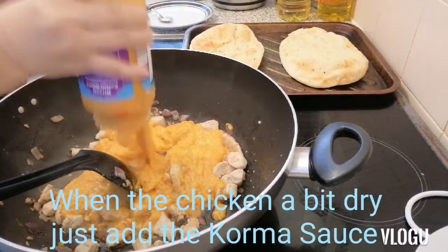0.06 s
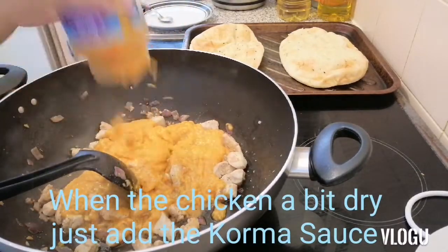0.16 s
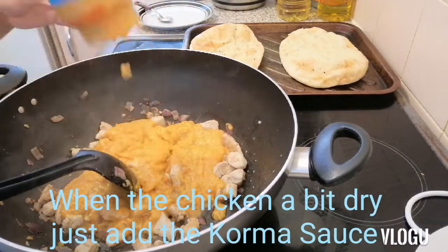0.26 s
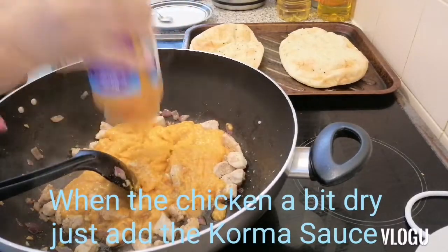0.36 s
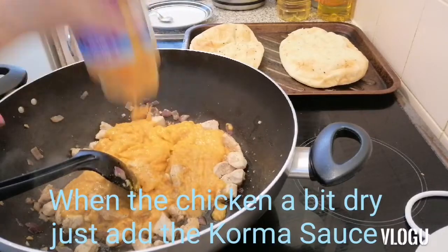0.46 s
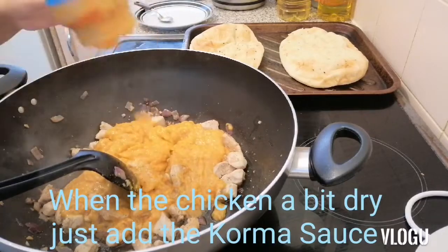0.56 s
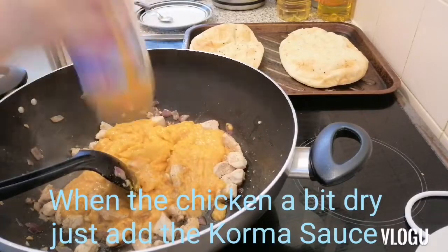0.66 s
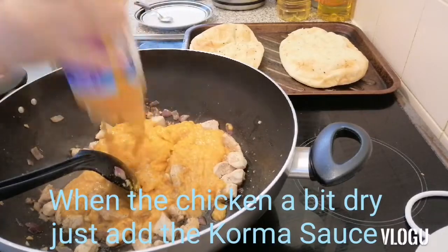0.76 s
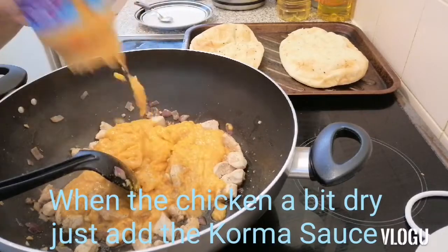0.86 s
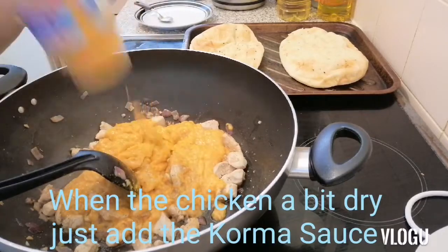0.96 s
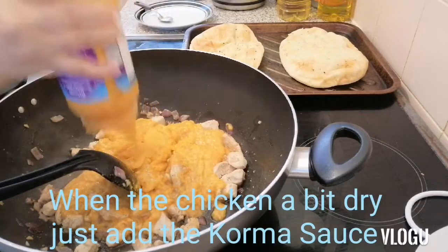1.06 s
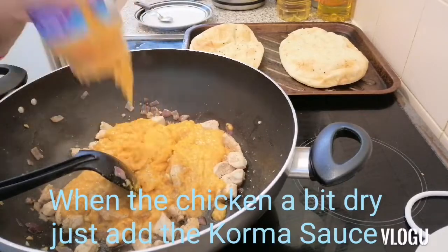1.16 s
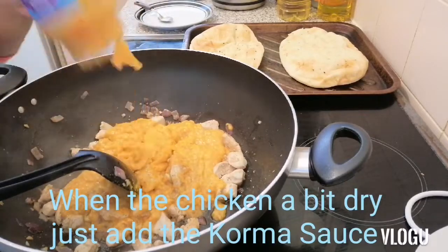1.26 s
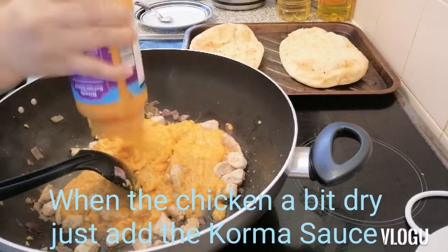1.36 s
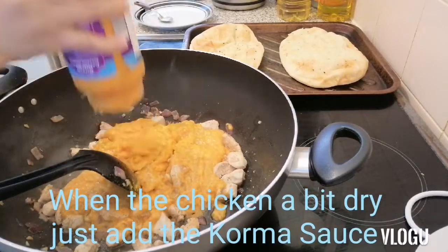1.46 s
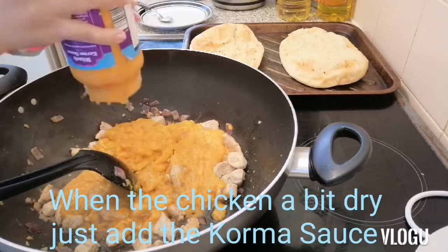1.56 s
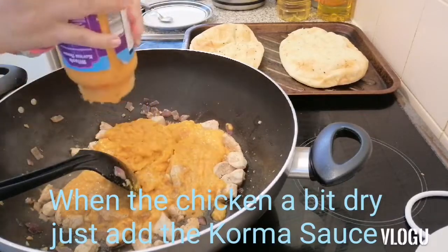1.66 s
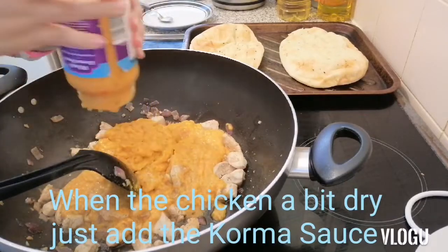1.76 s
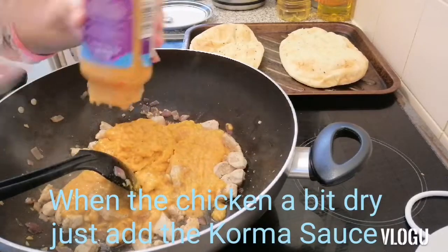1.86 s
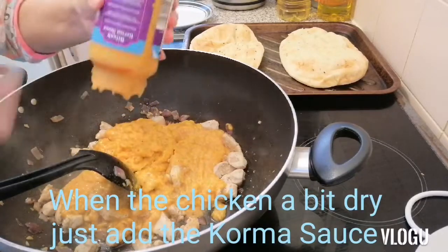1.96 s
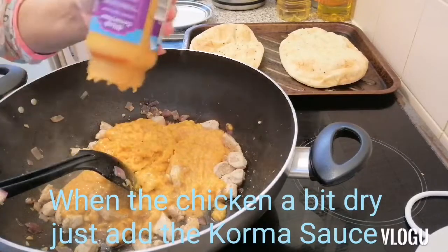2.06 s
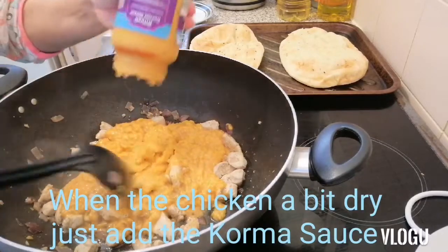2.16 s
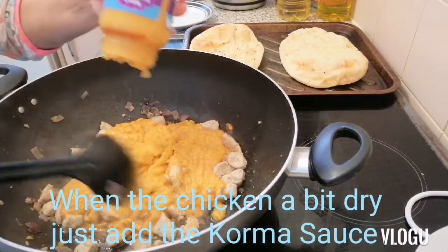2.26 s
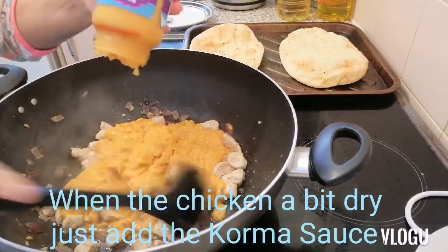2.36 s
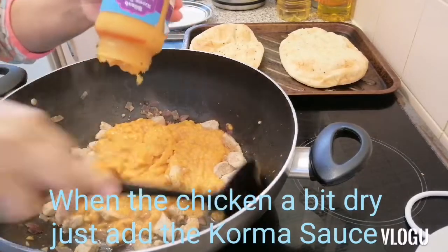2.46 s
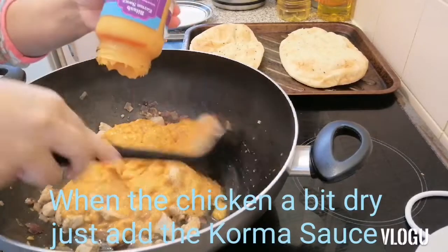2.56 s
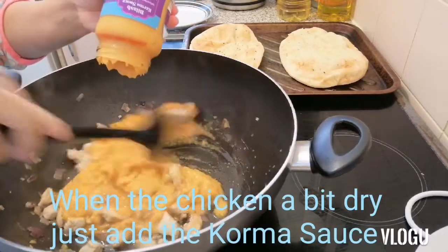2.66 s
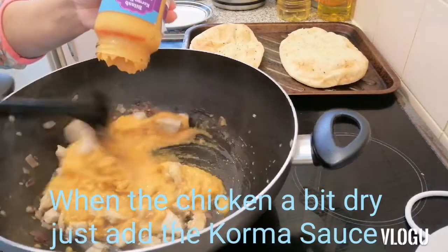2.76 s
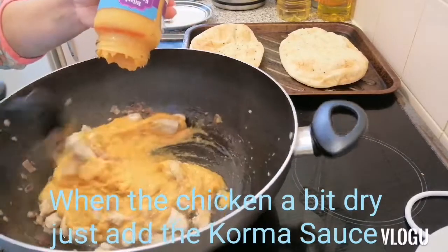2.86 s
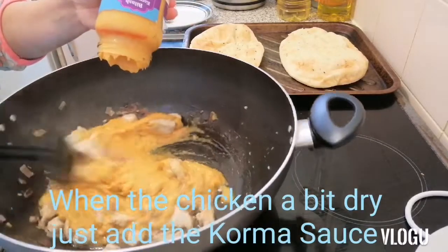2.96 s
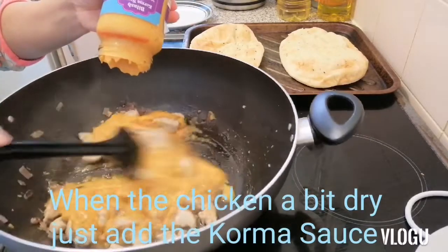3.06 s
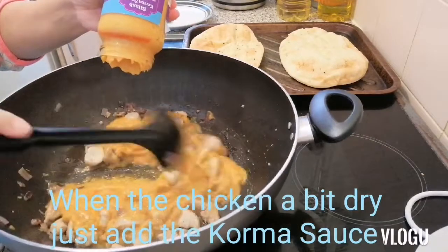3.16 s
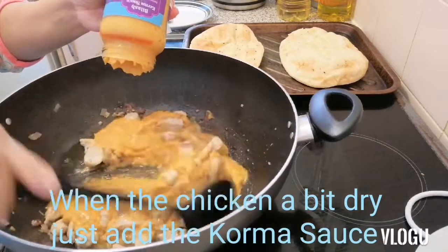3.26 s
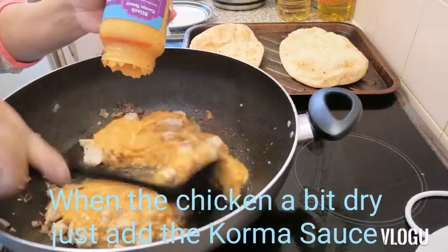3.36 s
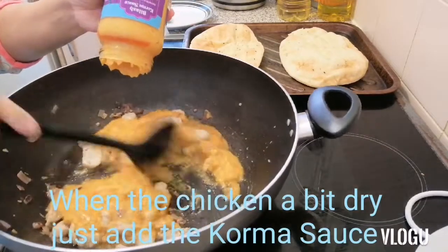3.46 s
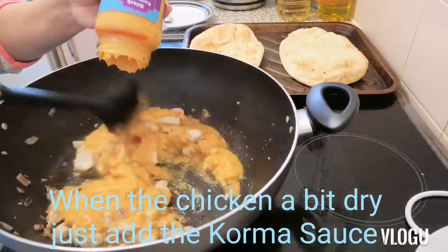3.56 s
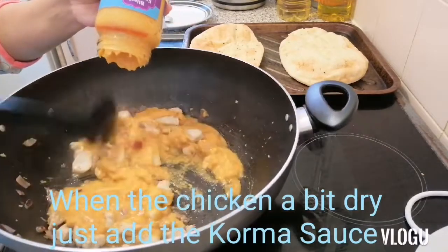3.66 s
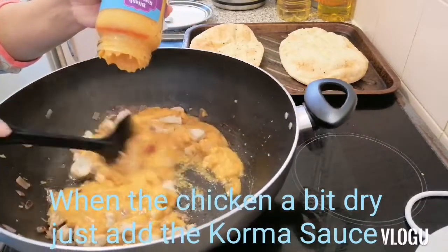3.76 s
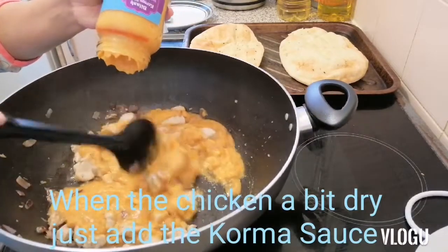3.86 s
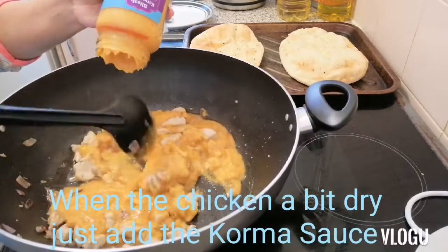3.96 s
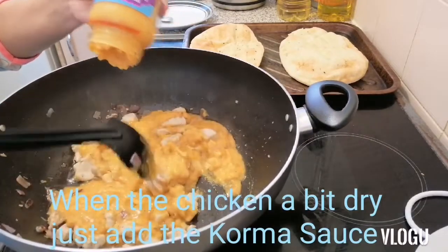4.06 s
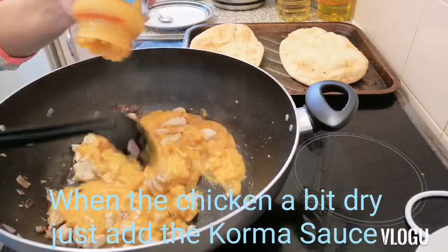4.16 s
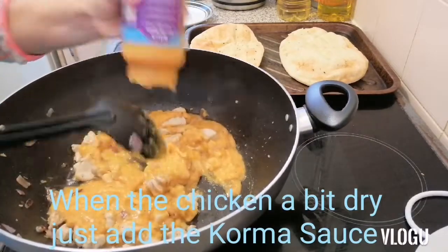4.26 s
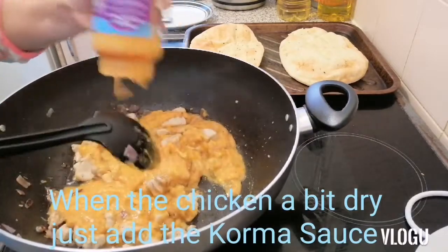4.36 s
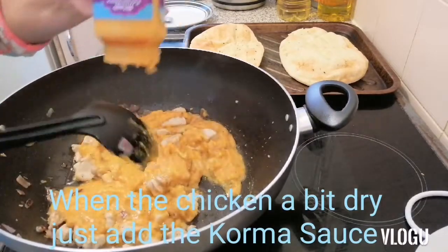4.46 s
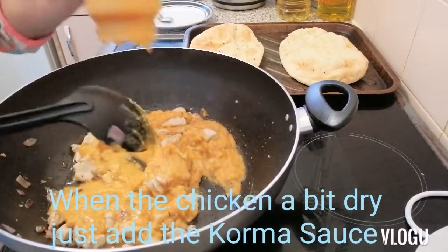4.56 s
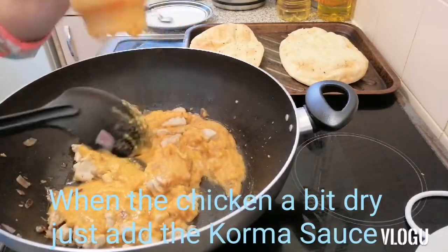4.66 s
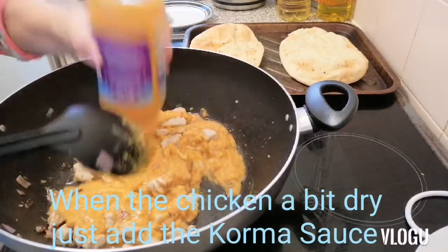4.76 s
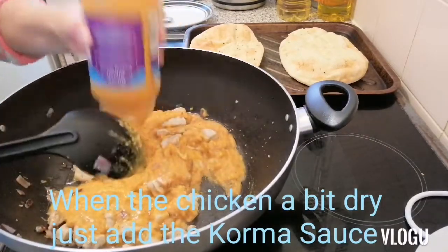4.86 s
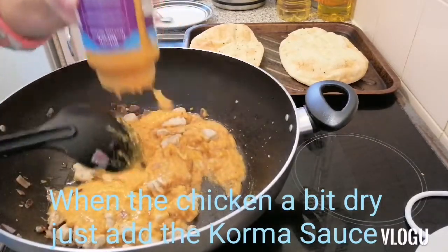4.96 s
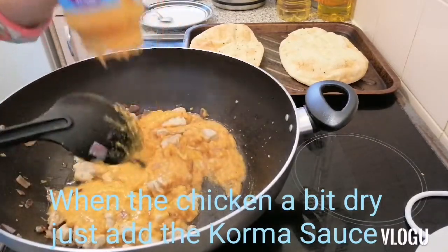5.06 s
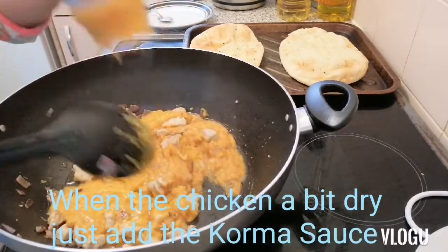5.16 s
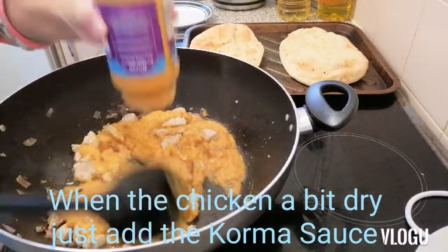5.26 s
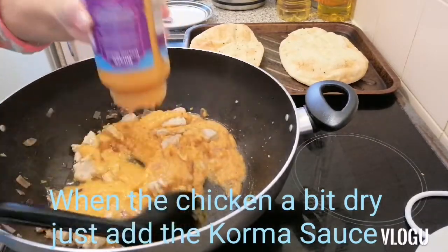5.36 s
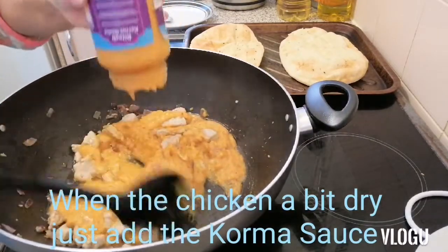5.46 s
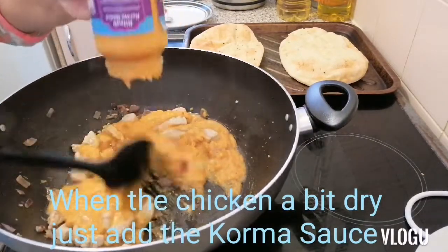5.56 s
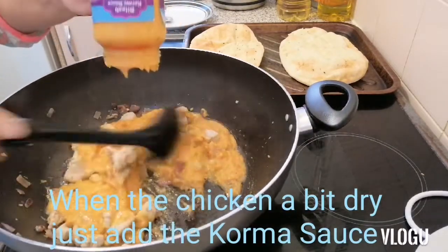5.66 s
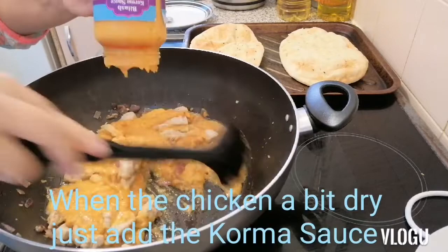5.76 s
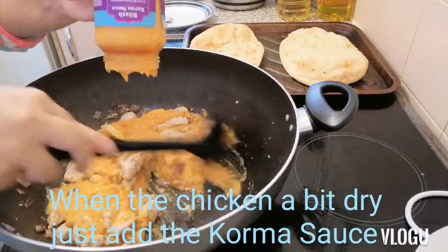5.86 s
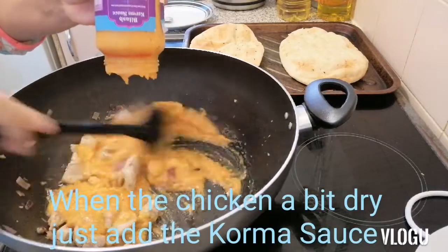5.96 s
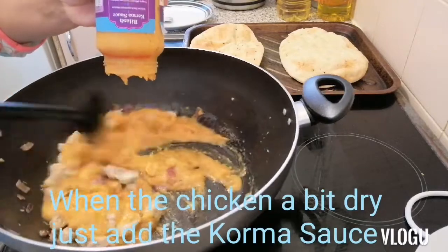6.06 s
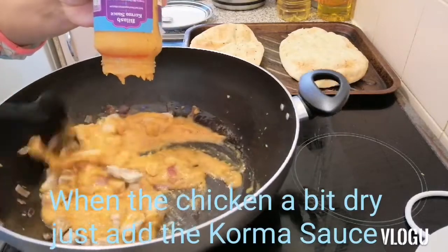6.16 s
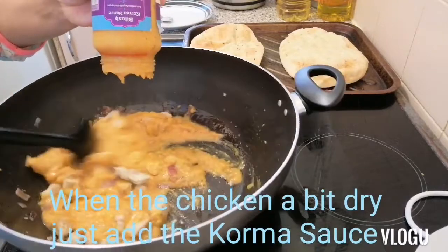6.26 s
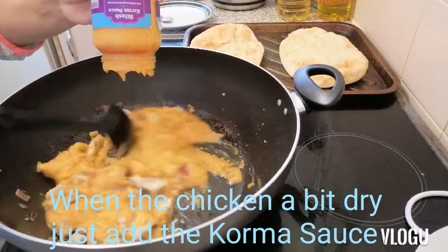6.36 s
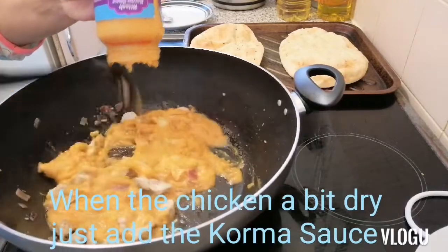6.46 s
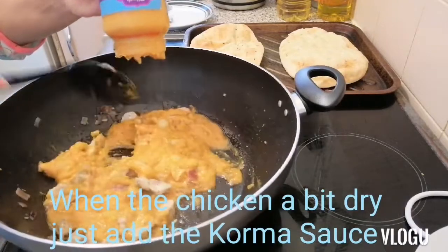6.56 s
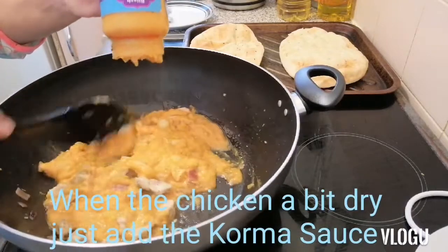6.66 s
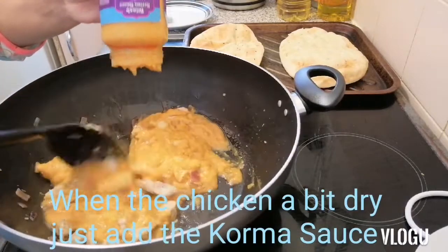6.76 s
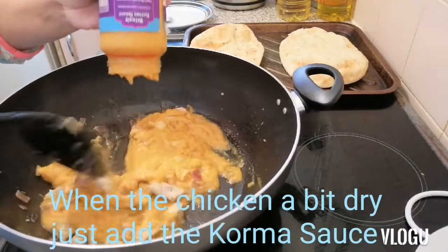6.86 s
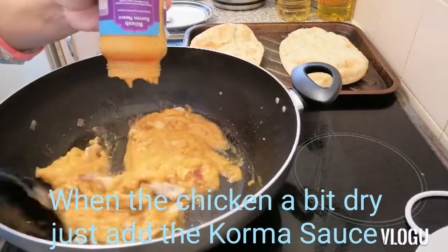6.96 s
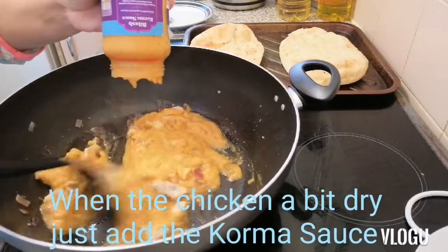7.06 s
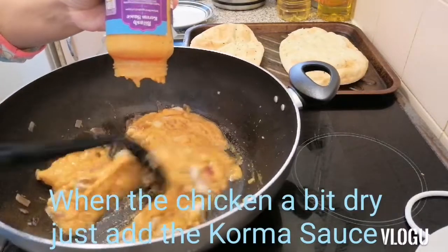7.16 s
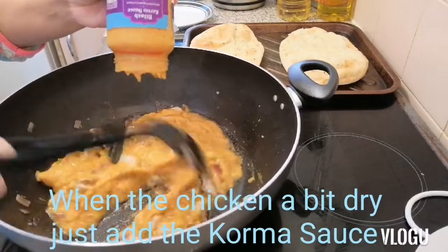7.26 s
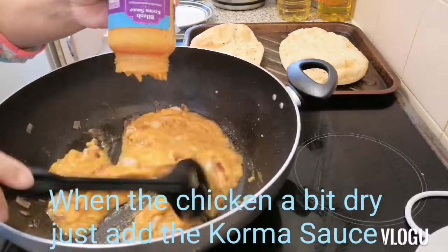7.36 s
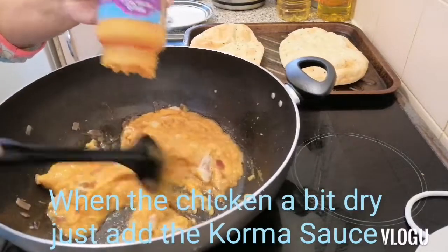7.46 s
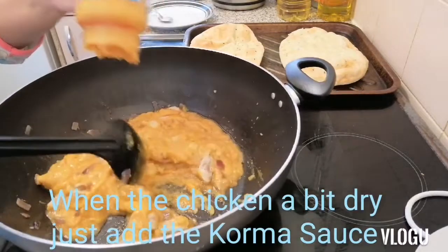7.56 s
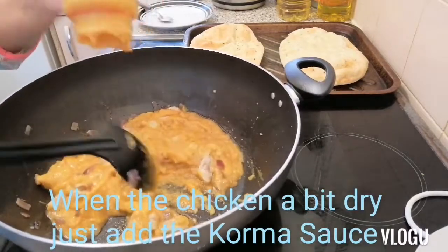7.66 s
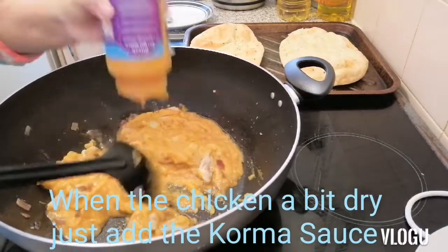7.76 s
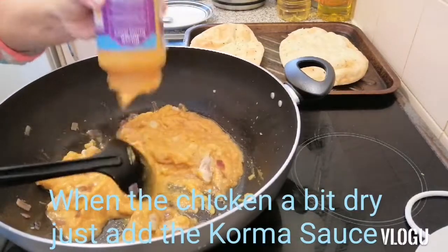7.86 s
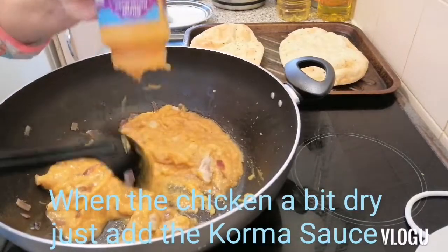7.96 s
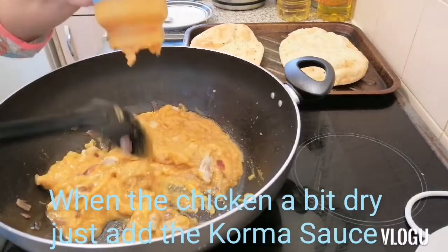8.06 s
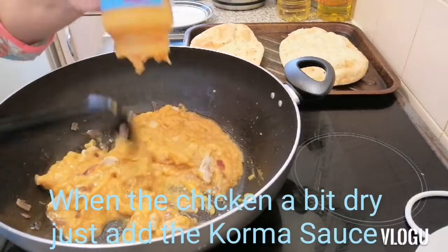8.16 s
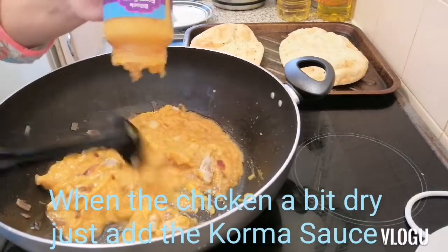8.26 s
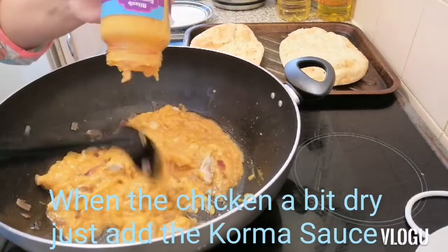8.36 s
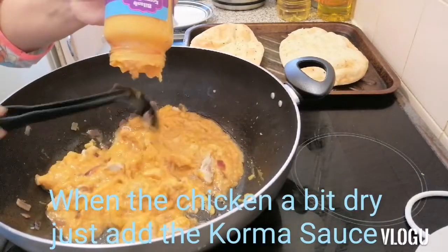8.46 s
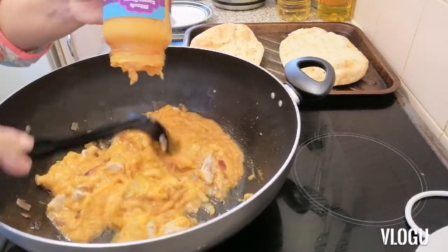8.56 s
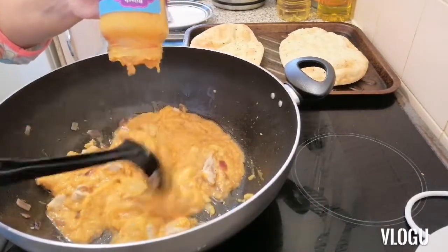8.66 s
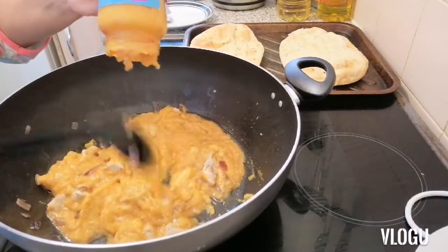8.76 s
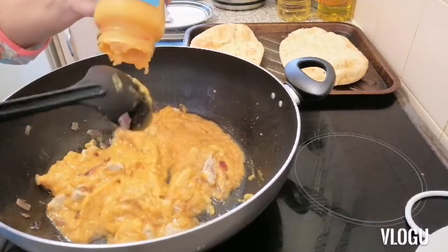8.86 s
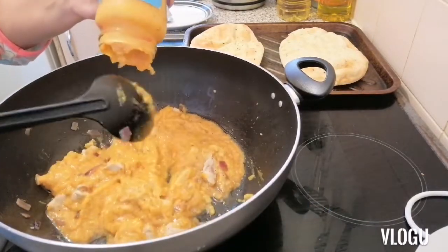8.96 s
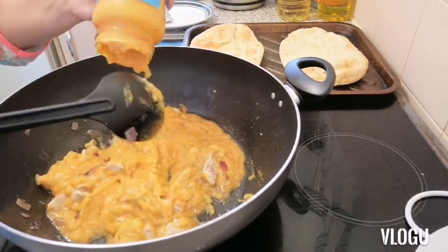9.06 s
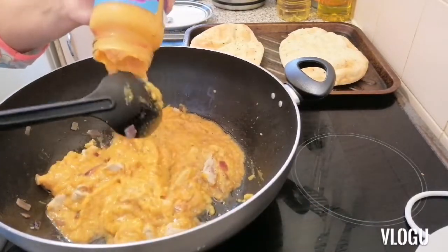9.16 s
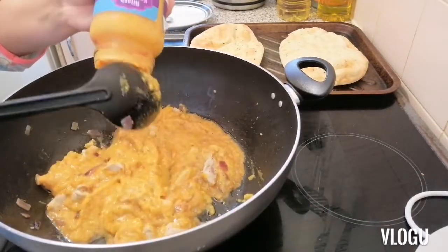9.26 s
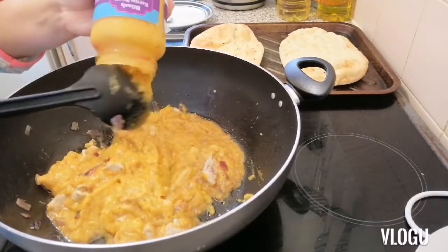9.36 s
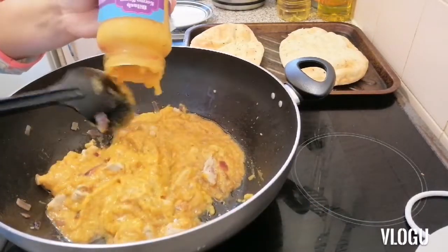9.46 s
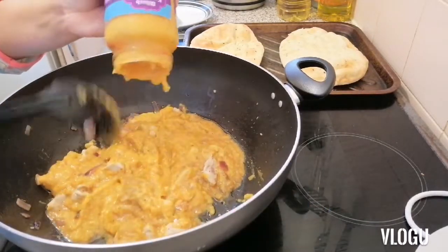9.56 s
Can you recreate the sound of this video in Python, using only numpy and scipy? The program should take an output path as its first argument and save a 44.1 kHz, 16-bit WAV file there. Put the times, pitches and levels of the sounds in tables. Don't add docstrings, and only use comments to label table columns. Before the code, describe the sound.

A pan of frying meat sizzles loudly, then sinks under thick sauce as a plastic spoon scrapes and knocks the metal in a small kitchen.

```python
import sys
import numpy as np
from scipy import signal
from scipy.fft import rfft, irfft, next_fast_len
from scipy.io import wavfile

SR = 44100
rng = np.random.default_rng(int(sys.argv[2]) if len(sys.argv) > 2 else 0)


def decibels_to_gain(level_db):
    exponent = np.asarray(level_db, float) / 20
    return 10 ** exponent


def store_wav(level_fs):
    pcm = np.round(np.clip(np.atleast_2d(level_fs), -1, 1) * 32767)
    wavfile.write(sys.argv[1], SR, pcm.T.astype(np.int16))


N = 423345

# (frequency [Hz], level [dB], t60 [s])
PAN_MODES = [(376, 12, 0.0354), (463, 5, 0.035), (750, 9.5, 0.038), (955, 8.5, 0.056), (1190, -36, 0.0078),
             (1310, 4, 0.018), (1565, 3, 0.011), (1680, 2.5, 0.017), (1920, -31, 0.048), (2150, -5, 0.042),
             (2330, 13, 0.054), (2610, 9, 0.061), (3020, -5.5, 0.0091), (3360, 1, 0.033)]


def sizzle():
    # (time [s], level [dB])
    frying_vigour = [(0.0, -42.5), (2.46, -45.5), (2.57, -45.5), (2.99, -47), (3.07, -51), (3.5, -49.5),
                     (3.87, -51), (4.49, -52.5), (5.37, -52.5), (5.61, -53.5), (6.71, -53), (6.98, -57.5),
                     (7.14, -58), (7.33, -57.5), (7.56, -61), (8.18, -58), (8.85, -64.5), (9.6, -64)]
    # (frequency [Hz], density [dB per Hz])
    bubble_colour = [(310, -19), (520, -28.5), (653, -12.5), (711, -17), (867, -10), (1100, -6), (1430, -6),
                     (2030, -2), (2480, -6), (4080, -11.5), (5570, -11.5), (8420, -16.5), (9560, -13),
                     (15500, -31.5)]
    # (frequency [Hz], t60 [s], level [dB])
    bowl_air = [
        (2020, 0.0045, -4.5),
        (5440, 0.0079, -6),
        (9600, 0.0058, -14),
    ]
    top_follows = 1.365
    patchy_db, shared_db = 1.3, 0.5

    level_db, = in_time(frying_vigour)
    bursts = grains(7000 * decibels_to_gain(2.0 * drift(40)), 3.5)
    bursts = rms_one(bursts + 1.1 * rng.standard_normal(N))
    bursts = bursts + 3.2 * np.diff(grains(60, 1.2), prepend=0)
    bursts = bursts + sum(decibels_to_gain(gain_db) * resonance(bursts, hz, t60) for hz, t60, gain_db in bowl_air)

    together_db = shared_db * drift(12)
    out = 0
    for hz, band in bands(bursts, bubble_colour, 235, count=13):
        share = np.clip(np.log2(hz / 2000) / 2.6, 0, 1.3)
        change_db = (1 + share * (top_follows - 1)) * (level_db - level_db[0])
        out = out + band * decibels_to_gain(change_db + together_db + patchy_db * drift(24.5))
    first_second_rms = np.sqrt(np.mean(out[:SR] ** 2))
    return out * decibels_to_gain(level_db[0] - 0.11) / first_second_rms


def scrapes():
    # (loudest moment [s], length [s], peak level [dB], brightness [dB], centre [Hz])
    strokes = [(2.538, 0.16, -39, -11.5, 1850), (2.695, 0.34, -53.5, -18, 1950),
               (2.996, .1, -36.5, -13, 1720), (3.114, 0.069, -46, -11, 2040),
               (3.352, 0.11, -36.5, -11, 1740), (3.268, 0.021, -45, -18, 1880),
               (3.652, 0.033, -60, 3, 1920), (3.715, 0.11, -46.5, -6, 1800), (3.843, 0.1, -43, -16, 2000),
               (5.152, 0.01, -48, -7, 1960), (5.252, 0.027, -50.5, -16, 2050),
               (5.45, 0.14, -45.5, -3, 1500), (5.8, 0.074, -59, 4.5, 1950), (5.918, 0.13, -52, -5.5, 1660),
               (6.152, 0.035, -50, -8, 1910), (6.332, 0.12, -53, -4.5, 2000), (6.584, .08, -40, -8.5, 1670),
               (6.693, 0.085, -40.5, -20, 1890), (6.79, 0.17, -55.5, -12, 1800),
               (7.055, 0.067, -41, -15, 1890), (7.154, 0.085, -60.5, -6.5, 1500),
               (7.445, 0.22, -58, -3.5, 1690)]
    # (loudest moment [s], length [s], peak level [dB], brightness [dB], centre [Hz])
    wall_slide = (7, 0.09, -34, -24, 1200)
    stroke_climb, slide_climb = 1.4, 9.3
    rise_share, fall_db = 0.52, 18.5
    rasp_lingers = 0.54

    t = np.arange(N) / SR
    level, bright, pitch = np.full(N, 1e-9), np.zeros(N), np.full(N, 1.7e-6)
    moves = [(*row, stroke_climb) for row in strokes] + [(*wall_slide, slide_climb)]
    for s, length_s, peak_db, bright_db, hz, climb in moves:
        late = (t - s) / length_s
        loss_db = fall_db * np.where(late < 0, (late / rise_share) ** 2, late)
        push = decibels_to_gain(peak_db - np.minimum(loss_db, 150))
        level += push
        bright += push * decibels_to_gain(bright_db + rasp_lingers * np.minimum(loss_db, 30))
        pitch += push * hz * 2 ** (climb * np.clip(t - s, -length_s, 2 * length_s))
    centre_hz = pitch / level

    slips = [grains(3000 * decibels_to_gain(3.7 * drift(30)), 2.0) for _ in range(2)]
    body = 0
    for k, (hz, _, t60) in enumerate(PAN_MODES[2:14]):
        answer = rms_one(resonance(slips[k % 2], hz, 0.6 * t60))
        body = body + answer * decibels_to_gain(-24.0 * np.log2(hz / centre_hz) ** 2)
    body = rms_one(band_pass(body, 415.6, 2660))
    rasp = rms_one(band_pass(slips[0], 2760, 6400) + 0.27 * band_pass(slips[1], 4700, 13000))
    return level * body + bright * rasp


def knocks():
    # (time [s], peak level [dB], loudest ring [Hz], low level [dB], rim level [dB])
    bottom_hits = [(2.5366, -31, 1750, -20.5, -15), (2.7917, -38.5, 1910, -1.5, -14),
                   (2.9178, -20.5, 1310, -12.5, -18), (3.6632, -17, 2150, -10, -6),
                   (5.3928, -27, 1580, -12, -27), (5.8679, -30.5, 1080, -6, -10),
                   (6.149, -47.5, 2200, -5, -12), (6.559, -30, 1000, -3.5, -6),
                   (7.028, -28, 1840, -10, -30), (7.097, -31, 960, -2, -23), (7.311, -8, 1600, -23.5, -9.5),
                   (8.5082, -7.5, 1720, -21, -16)]
    # (time [s], peak level [dB], loudest ring [Hz], ring level [dB], rim level [dB])
    rim_hits = [
        (2.8873, -8.5, 1500, 9, -2),
        (5.4453, -41, 2100, 0, 14),
        (6.5215, -18.5, 1780, -3, 9),
        (6.9242, -16.5, 1360, 5, 4.5),
    ]
    top_db, top_per_rim = -11, 0.73
    knock_ring_db, knock_echo_db, clack_echo_db = 0.5, -8, 2
    wall_s, wall_db = 0.0052, -15

    hits = []
    for s, peak_db, ring_hz, low_db, rim_db in bottom_hits:
        high_db = top_db + top_per_rim * rim_db
        colour = [(420, low_db), (780, 0.37 * low_db - 2.5), (1250, -2.5), (2500, -0.3 * low_db - 8.5),
                  (3300, 0.61 * rim_db - 5.5), (5300, rim_db), (10000, high_db), (13000, high_db - 16)]
        hits.append((s, decibels_to_gain(peak_db) * blow(colour, ring_hz, knock_ring_db), knock_echo_db))
    for s, peak_db, ring_hz, ring_db, rim_db in rim_hits:
        high_db = top_db + top_per_rim * rim_db
        colour = [(420, -46), (780, -23), (1150, -3.5), (1750, -2), (2500, -5.5), (3300, -5),
                  (4500, rim_db - 3), (5700, rim_db), (10000, high_db), (13000, high_db - 13)]
        hits.append((s, decibels_to_gain(peak_db) * blow(colour, ring_hz, ring_db), clack_echo_db))

    out, room = np.zeros(N), np.zeros(N)
    for s, piece, echo_db in hits:
        start = s - 0.0016
        add(out, start, decibels_to_gain(-6.5) * piece)
        add(out, start + wall_s, decibels_to_gain(-5.0 + echo_db + wall_db) * piece)
        add(room, start, decibels_to_gain(-6.5) * kitchen(piece))
    return out, room


def blow(colour, ring_hz, ring_db):
    # (low edge [Hz], high edge [Hz], t60 [s])
    crack_bands = [(283, 564, 0.018), (601, 904, 0.017), (926, 1614, 0.0093), (1500, 2160, 0.016),
                   (2100, 2756, 0.0064), (3020, 3650, 0.0037), (4030, 4917, 0.028), (4730, 6050, 0.031),
                   (6600, 9660, 0.027), (8600, 11000, 0.0064), (11200, 15000, 0.006)]
    t = np.arange(SR // 8) / SR
    rattle = 0.2 * rng.standard_normal(len(t)) * np.minimum(t / 0.0012, 1)
    piece = np.zeros(len(t))
    for low_hz, high_hz, t60 in crack_bands:
        force = rattle * decibels_to_gain(-60 * t / t60)
        force[round(0.000935 * SR)] += 1
        crack = band_pass(force, low_hz, high_hz)
        piece += crack / np.abs(crack).max() * decibels_to_gain(at_hz(colour, np.sqrt(low_hz * high_hz)))
    return piece + decibels_to_gain(ring_db) * resonance(piece, ring_hz, 0.0079)


def pan_modes(blows):
    # (frequency [Hz], level [dB], t60 [s])
    rim_modes = [(4440, 3, 0.022), (5300, -22, 0.041), (5010, 9.5, 0.033), (5600, 9, .025),
                 (5750, -3, 0.035), (7500, 6, 0.0042)]
    return sum(resonance(blows, hz, 0.93 * t60) * decibels_to_gain(mode_db - 3.0)
               for hz, mode_db, t60 in PAN_MODES + rim_modes)


def thuds():
    # (time [s], peak level [dB], frequency [Hz], t60 [s], boom of the hob [dB])
    rocks = [(2.539, -32, 153, 0.11, -10), (2.792, -38, 201, 0.13, -1.5), (2.919, -26, 153, 0.099, -12),
             (2.962, -30.5, 200, 0.11, -3), (3.665, -15, 153, 0.037, -20), (3.686, -21, 140, 0.065, -8.5),
             (5.395, -32.5, 194, 0.28, -8.5), (5.864, -34, 160, 0.16, -8), (6.157, -48, 144, 0.12, -25),
             (6.56, -25.5, 159, 0.13, -12), (6.581, -27.5, 168, 0.2, -31), (7.031, -21, 164, 0.22, -11),
             (7.0988, -16.5, 154, 0.081, -17.5), (7.116, -28, 156, 0.086, -7),
             (7.312, -22, 364, 0.053, -20), (7.396, -34.5, 193.6, 0.55, -9),
             (8.508, -18, 304, 0.032, -25.5)]
    # (frequency [Hz], level [dB], t60 [s])
    hob_modes = [
        (39.3, -4.5, 0.33),
        (73, 0.5, 0.1),
        (110.7, -4, 0.18),
    ]
    t = np.arange(SR // 2) / SR
    push = np.sin(np.pi * np.minimum(t / 0.0012, 1)) ** 2
    push /= push.sum()
    boom = sum(ring(push, hz, t60) * decibels_to_gain(mode_db + 9.5) for hz, mode_db, t60 in hob_modes)
    out = np.zeros(N)
    for s, peak_db, hz, t60, boom_db in rocks:
        bottom = ring(push, hz, t60) + 0.33 * ring(push, 1.193 * hz, 0.64 * t60)
        thud = resonance(bottom, hz, 0.0034) + decibels_to_gain(boom_db) * boom
        add(out, s - 0.002, decibels_to_gain(peak_db - 4.5) * thud)
    return signal.sosfilt(signal.butter(2, 32, "high", fs=SR, output="sos"), out)


def spits():
    # (time [s], peak level [dB], frequency [Hz], t60 [s], snap share [ratio])
    droplets = [(1.068, -32.5, 4300, 0.0068, 0.37), (3.968, -41, 5240, 0.0043, 0.52),
                (5.417, -34, 3380, 0.011, 0.31), (6.836, -44, 5600, 0.0071, 0.53),
                (7.479, -47.5, 4230, .02, .3), (7.812, -51, 7500, 0.0045, 0.93),
                (8.479, -47, 5240, 0.006, 0.97), (8.485, -42, 5400, 0.015, 0.18),
                (9.255, -44, 2010, 0.014, .1), (9.258, -49, 7700, 0.032, 0.89),
                (9.439, -67, 5900, 0.0042, .5)]
    out, t = np.zeros(N), np.arange(SR // 10) / SR
    for s, peak_db, hz, t60, snap_share in droplets:
        noise = rng.standard_normal(len(t))
        tone = noise * decibels_to_gain(-60 * t / max(t60, 0.002))
        for _ in range(2):
            tone = resonance(tone, hz, 0.0023)
        snap = band_pass(noise * decibels_to_gain(-60 * t / 0.0028), 1.2 * hz, min(2.9 * hz, 14000))
        burst = tone / np.abs(tone).max() + snap_share * snap / np.abs(snap).max()
        add(out, s - 0.001, decibels_to_gain(peak_db) * burst)
    return out


def hood():
    # (multiple of twice the mains [count], multiple of rotor speed [count], level [dB rms])
    motor_lines = [(0, 1, -67.5), (1, -1, -64.5), (1, 0, -51.5), (1, 1, -91.5), (1, 2, -67.5),
                   (2, 0, -65.5), (2, 1, -76.5), (3, 0, -72.5), (3, 1, -78.5), (4, 0, -77.5)]
    # (frequency [Hz], density [dB per Hz])
    airflow = [(20, -0.5), (40, 3.5), (70, -7), (130, 0), (180, -5.5), (260, -13.5), (400, -20),
               (700, -24.5), (1300, -21.5), (2700, -25.5), (4000, -36)]
    magnet_hz, rotor_hz, air_db = 99.84, 32.05, -57
    start_db, sag_db_per_s = 6, 0.59

    t = np.arange(N) / SR
    hum = 0
    for magnet, rotor, level_db in motor_lines:
        line_hz = round(magnet) * magnet_hz + round(rotor) * rotor_hz
        phase = 2 * np.pi * (line_hz * t + rng.random())
        hum = hum + np.sqrt(2) * decibels_to_gain(level_db + 0.79 * drift(4.7)) * np.sin(phase)
    air = sum(band * decibels_to_gain(1.8 * drift(5)) for _, band in bands(rng.standard_normal(N), airflow, 20, count=17))
    return (hum + decibels_to_gain(air_db) * rms_one(air)) * decibels_to_gain(start_db - sag_db_per_s * t)


def kitchen(x):
    # (frequency [Hz], t60 [s])
    room_t60 = [(100, 0.67), (500, 0.29), (2000, 0.32), (5000, 0.3), (12000, 0.17)]
    t = np.arange(SR // 2) / SR
    wall_colour = [(100, 10.5), (1500, 0), (5000, 0.0), (15000, 0.5)]  # Hz, dB
    walls = bands(rng.standard_normal(SR // 2), wall_colour, 88.7, count=17)
    tail = sum(band * decibels_to_gain(-60 * t / at_hz(room_t60, hz)) for hz, band in walls)
    tail *= np.clip((t - 0.003) / 0.0017, 0, 1)
    tail *= decibels_to_gain(-8.0 * np.minimum(t / 0.26, 2) ** 4)
    return signal.fftconvolve(x, tail / np.sqrt(np.sum(tail ** 2)))[:N]


def rms_one(x):
    return x / np.sqrt(np.mean(x ** 2) + 1e-20)


def in_time(rows):
    s, *columns = np.transpose(rows)
    return [np.interp(np.arange(N) / SR, s, c) for c in columns]


def at_hz(points, hz):
    table_hz, values = np.array(points).T
    return np.interp(np.log(hz), np.log(table_hz), values)


def drift(rate):
    r = np.exp(-80 * np.pi * rate / SR)
    noise = rng.standard_normal(N // 40 + 2002)
    slow = signal.lfilter([1], [1, -2 * r, r * r], noise)[2000:]
    return np.interp(np.arange(N) / 40, np.arange(len(slow)), rms_one(slow))


def grains(per_s, spread_db):
    sizes = decibels_to_gain(spread_db * np.minimum(rng.exponential(1, N), 6)) * rng.choice([-1, 1], N)
    return sizes * (rng.random(N) < per_s / SR)


def ring(clicks, hz, t60):
    r, w = decibels_to_gain(-60 / (max(t60, 0.002) * SR)), 2 * np.pi * hz / SR
    return signal.lfilter([0, np.sin(w)], [1, -2 * r * np.cos(w), r * r], clicks + 1e-18)


def resonance(x, hz, t60):
    r, w = decibels_to_gain(-60 / (max(t60, 0.002) * SR)), 2 * np.pi * hz / SR
    return signal.lfilter([(1 - r * r) / 2, 0, (r * r - 1) / 2], [1, -2 * r * np.cos(w), r * r], x + 1e-18)


def band_pass(x, low_hz, high_hz):
    return signal.sosfilt(signal.butter(3, [low_hz, high_hz], "band", fs=SR, output="sos"), x)


def bands(x, spectrum, low_hz, count):
    size = next_fast_len(len(x))
    hz = np.maximum(np.fft.rfftfreq(size, 1 / SR), 1)
    coloured = rfft(x, size) * decibels_to_gain(at_hz(spectrum, hz))
    for k in range(count):
        away = np.clip(2 * np.log2(hz / low_hz) - k, -1, 1)
        yield low_hz * 2 ** (k / 2), irfft(coloured * np.cos(away * np.pi / 2) ** 2, size)[:len(x)]


def add(out, s, piece):
    at = round(s * SR)
    out[at:at + len(piece)] += piece[:N - at]


def scene():
    fat, dull, frying, fan = spits(), thuds() + scrapes(), sizzle(), hood()
    cracks, echoes = knocks()
    near = cracks + pan_modes(cracks) + fat + dull + frying
    far = echoes + kitchen(decibels_to_gain(-2) * fat + decibels_to_gain(-13.5) * dull + decibels_to_gain(-11.0) * frying)
    return (near + far + fan)[None]


def band_limit(x):
    return signal.sosfilt(signal.butter(12, 16390, fs=SR, output="sos"), x)


def record(dry):
    rounded = 0.8 * np.tanh(dry / 0.8)
    top_cut = signal.cheby2(10, 40, 15950, fs=SR, output="sos")
    return band_limit(signal.sosfilt(top_cut, rounded))


dry = scene()
out = record(dry)
store_wav(out)
```